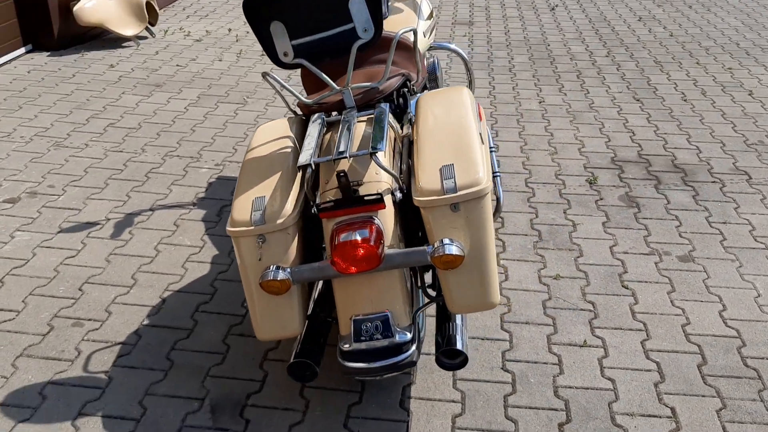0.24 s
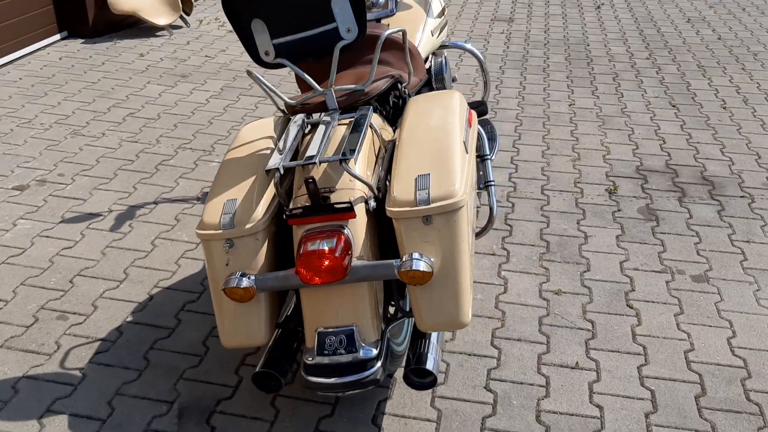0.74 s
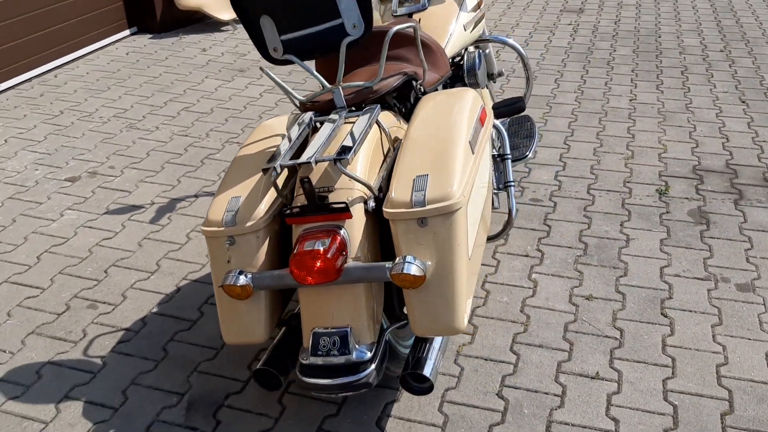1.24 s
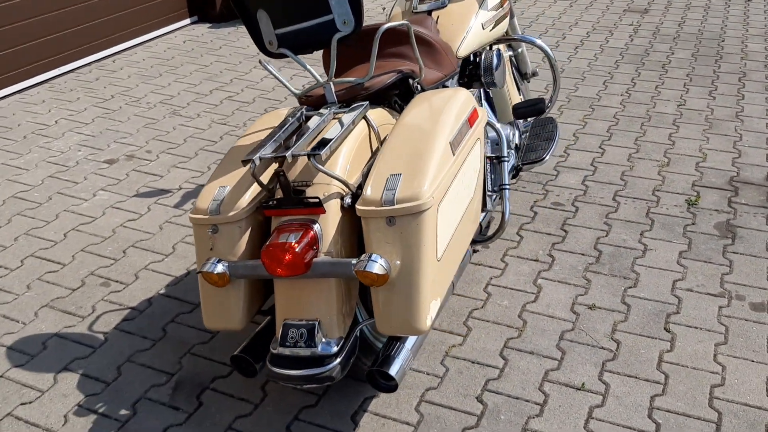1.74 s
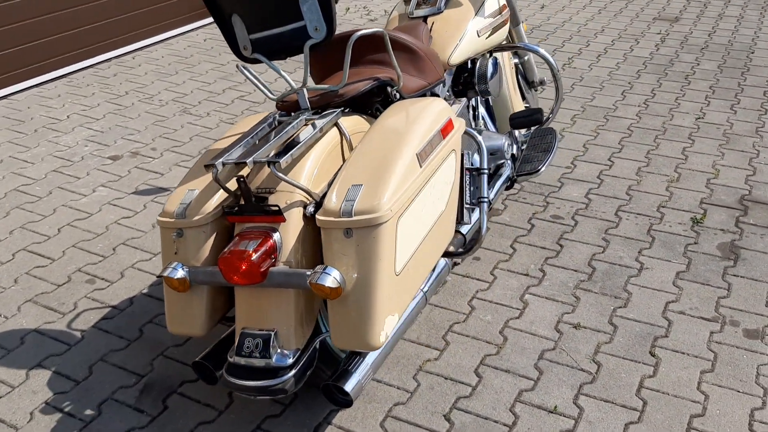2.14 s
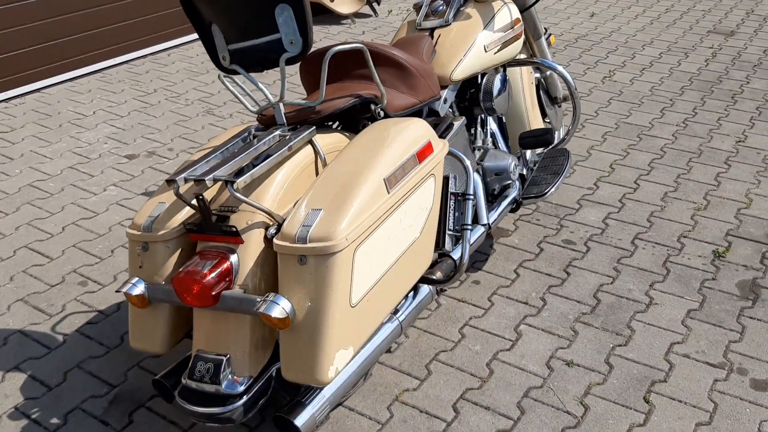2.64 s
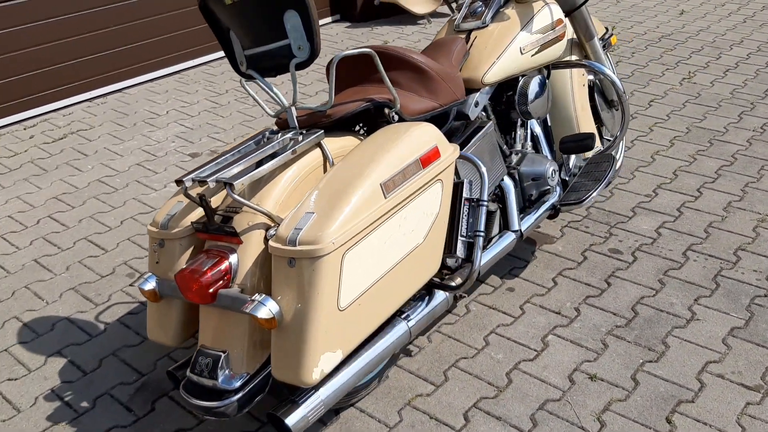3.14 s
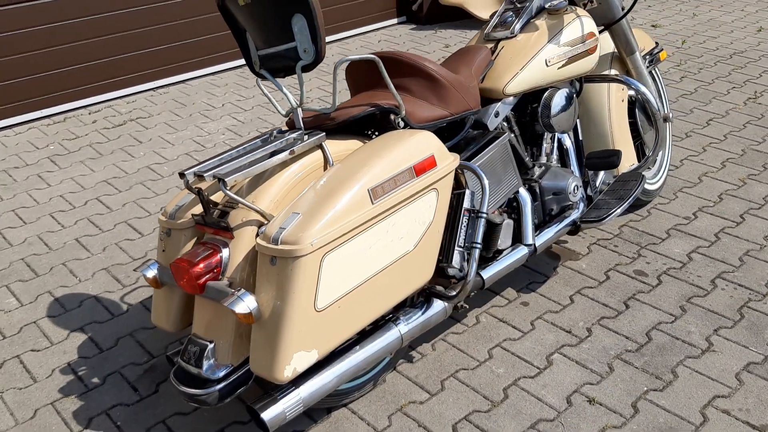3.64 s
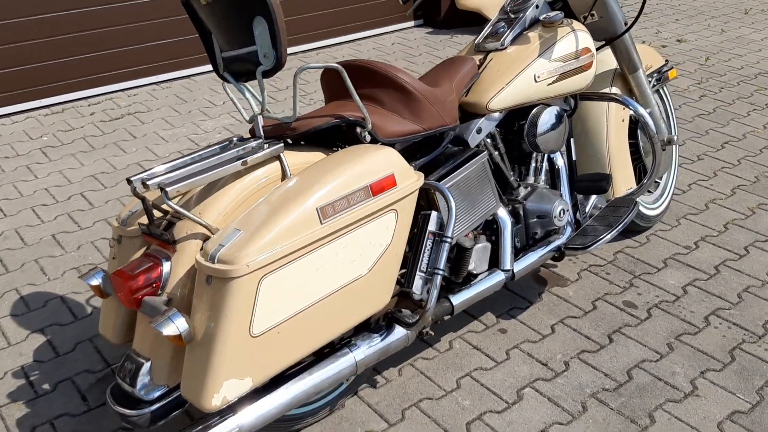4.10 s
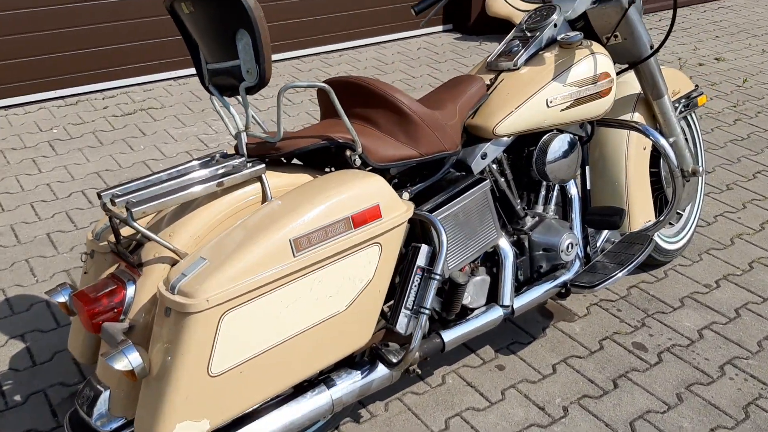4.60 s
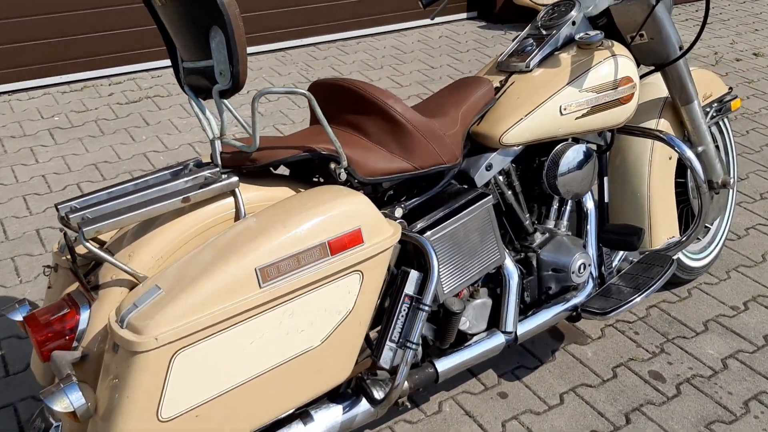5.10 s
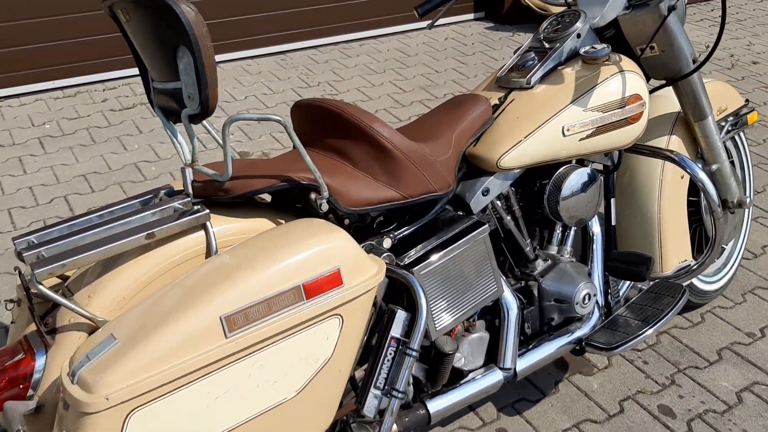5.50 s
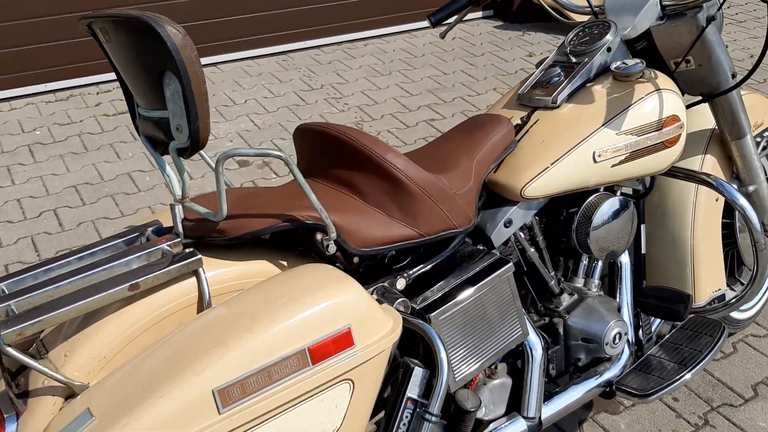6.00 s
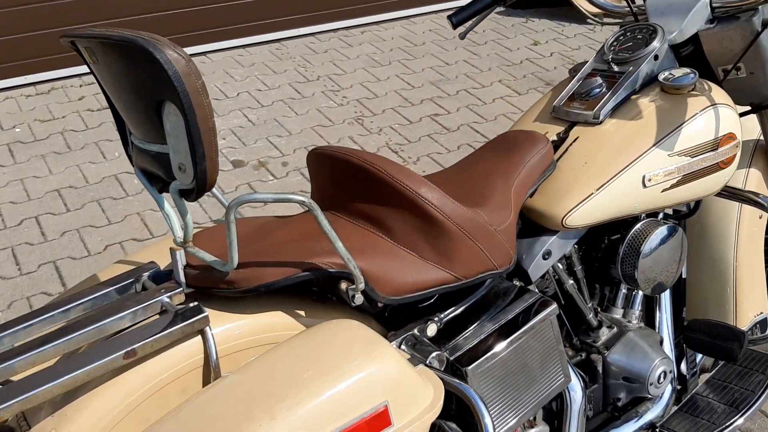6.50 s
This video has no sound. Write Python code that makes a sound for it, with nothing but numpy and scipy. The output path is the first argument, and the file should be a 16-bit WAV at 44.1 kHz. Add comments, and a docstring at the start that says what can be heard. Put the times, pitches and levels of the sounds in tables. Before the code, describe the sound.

Low, lumpy exhaust beats come from a large idling V-twin motorcycle close by, with valves ticking along in step.

```python
"""V-twin motorcycle at idle

A big V-twin lopes on a paved yard while we walk from its tailpipes towards the engine.
Each cylinder either fires (a boom in its pipe, a bark, a hissing, whistling jet of gas) or skips
(a soft suck). Valve gear clatters in step, cooling fins ping, and a garage wall answers faintly."""
import sys
import numpy as np
from scipy import signal
from scipy.fft import rfft, irfft, next_fast_len
from scipy.io import wavfile
from scipy.ndimage import map_coordinates

SR = 44100
rng = np.random.default_rng(int(sys.argv[2]) if len(sys.argv) > 2 else 0)


def master_out(mix):
    """Clip the mix to full scale and print it as 16-bit PCM to the path in sys.argv[1]."""
    frames = np.transpose(np.atleast_2d(mix))
    ceiling = np.clip(frames, -1, 1)
    pcm = np.round(ceiling * 32767).astype(np.int16)
    wavfile.write(sys.argv[1], SR, pcm)


N = 297675

# base idle, drifting and sagging late on; the flywheel's surge adds to it (time [s], speed [rpm])
BASE_IDLE = [(0, 779.1), (1.74, 801.1), (2.19, 743.8), (2.72, 788), (3.64, 809.6), (4.16, 718.3),
             (4.65, 718), (4.77, 760), (4.95, 679), (5.1, 718), (5.35, 718.5), (5.54, 608), (5.93, 674.2),
             (6.75, 770)]
# the rear cylinder skips, except for the strokes near these moments (time [s])
REAR_FIRES = [.27, .6, .91, 1.54, 1.85, 2.31, 2.77, 3.37, 3.82, 4.13, 4.65, 5.18, 5.5, 5.68, 6.02, 6.54]
# the front cylinder fires fully, except for these misfires (time [s], burn [share])
FRONT_MISFIRES = [(.03, 0), (.18, 0), (.52, 0), (1.14, 0), (1.47, 0), (3.45, .6), (3.75, .6), (4.38, 0),
                  (4.74, 0), (6.1, 0), (6.46, .6)]
# balance of a firing along the walk (time [s], boom [dB], bark [dB], hiss [dB], whistle [dB])
EXHAUST_LEVELS = [(0, -5.5, -33, -47.5, -37), (.27, 1.1, -33.5, -46.5, -34.5),
                  (2.3, 0.3, -35.5, -44, -36.5), (3.2, 0.2, -33.5, -47.5, -40.5),
                  (4.1, -0.6, -37.5, -45.5, -49), (5.0, 0.5, -32.5, -40, -49),
                  (5.7, -0.5, -35.5, -42.5, -38), (6.75, 2, -31, -45, -47)]
# valve gear hits (position [share of a cycle], ticking [dB], clatter [dB])
VALVE_HITS = [(.0, 6.5, -20), (.17, -17, -58), (0.362, 1, -0.5), (0.508, 6.5, -15), (.67, -20, -28.5)]
# the engine grows as it comes nearer (time [s], clatter [dB], ticking [dB])
ENGINE_LEVELS = [(0.0, -38.5, -53.5), (0.56, -38.5, -52.5), (1.49, -39.5, -53.5), (3.16, -37, -48),
                 (6.37, -35, -45), (6.75, -33.5, -44.5)]
# the whistle fades as we leave the tailpipe's axis (time [s], level [dB])
WHISTLE_BEAM = [(0, 0), (1.5, 1), (3, -3), (4.5, -8), (6.75, -8)]
# tones of the jet at the tailpipe (pitch [Hz], level [dB], decay [s])
WHISTLE_TONES = [(5350, -6, .008), (5580, -1, .005), (6700, -2, .004), (7300, -12, .005)]
# stray rocker taps (time [s], level [dB])
ROCKER_TAPS = [(4.5336, -38), (4.8738, -26.5), (5.2244, -26), (5.907, -26), (6.2495, -22), (6.4213, -27),
               (6.5914, -25)]

# ringing metal parts (frequency [Hz], width [Hz], level [dB])
CASTING_MODES = [(734, 49, 6), (960, 28, -3.5), (1489, 44, 6.5), (2040, 45, -2.5), (2617, 130, -4.5),
                 (4456, 88, -3), (4960, 87, -6.5), (7550, 750, -20)]
FIN_MODES = [(2615, 40, 3.5), (3055, 67, -5), (4520, 58, 1.5), (5040, 59, -6), (5220, 70, -1),
             (7110, 90, -6)]
PIPE_WALL_MODES = [(1484, 60, -3), (3080, 94, -9.5), (3606, 110, -11.5)]
ROCKER_BOX_MODES = [(1010, 260, -1.5), (1190, 210, 1), (2000, 220, -10)]
# resonances of the gas in the exhaust (frequency [Hz], width [Hz], level [dB])
REAR_PIPE_MODES = [(77.7, 48.5, 45), (56, 13.4, 47), (140.4, 28, 48), (168.9, 4.7, 45.5), (200, 79, 25.5)]
FRONT_PIPE_MODES = [(61.7, 12.5, 47), (104.2, 11.5, 48), (82.6, 62, 48.53), (216, 21, 31), (303, 140, 39.6)]
MUFFLER_MODES = [(75.7, 27.4, 3.5), (137, 25, -4), (170.6, 9.8, 5.5), (250, 28, -11.5)]
TAILPIPE_MODES = [(1500, 140, -1), (3300, 320, 1.5), (5440, 210, 4.5), (6900, 740, -8.5), (8300, 290, -19)]
# noise colours of the valve gear and the firings (frequency [Hz], level [dB])
CLATTER_EQ = [(100, -27), (240, 0), (285, -0.5), (380, 3.5), (520, 1.5), (600, -1), (780, -1), (1150, -2),
              (1300, -5), (1800, -7), (2700, -13.5), (4000, -14), (8000, -85)]
TICKING_EQ = [(800, -50), (2000, 5.5), (3000, 0), (3800, -1.5), (5500, 7.5), (7500, 5.5), (8700, -4.5),
              (10000, 0.5), (11800, 3), (13500, -1.5), (16000, -2.5)]
BARK_EQ = [(120, -57), (235, 13.5), (285, -1.5), (340, 4), (500, -0.5), (600, -9.5), (730, 1), (900, -9.5),
           (1500, -11.5), (2500, -14), (5000, -29)]
HISS_EQ = [(500, -34), (1000, -16), (2000, -6), (3200, 6), (4200, 5.5), (6000, 13.5), (7800, 12.5),
           (8800, 1.5), (11500, 11), (13500, 5), (16000, -1)]

# stereo width of the noise (frequency [Hz], left-right correlation [-1 to 1])
STEREO_LIKENESS = [(150, 0.98), (350, 0.98), (700, 0.87), (1400, 0.53), (2800, 0.028), (6000, -0.2),
                   (12000, -0.018)]
# stereo balance (frequency [Hz], left over right [dB])
BALANCE = [(40, 2.3), (90, 1.8), (180, .8), (350, .2), (1400, .6), (2800, -.5), (5600, -2.2), (11000, -1.1)]
# the bass reaches the two sides out of step (frequency [Hz], left lead [rad])
BASS_PHASE = [(40, 0.39), (80, 0.3), (140, .12), (400, .05)]

FIRST_STROKE_S, REAR_LAG = .0224, .4486  # the rear follows the front by this share of a cycle
# flywheel: kick per unit of burn, the burn that balances the drag, share of surge left a stroke later
KICK_RPM, DRAG_BURN, SURGE_KEPT = 80.8, .6, .7227
# trims on a firing (boom [dB], bark [dB], hiss [dB], whistle [dB])
FRESH_DB = (1.4, 3.3, 4.5, 4.65)  # after a misfire the front has a fresher charge and hits harder
REAR_DB = (0.5, 2.5, 0.5, -0.5)
SCATTER_DB = (0.69, 0.9, .8, 1)
NOISE_POWER = 2.8  # bark and jet grow as this power of the burn
FRONT_SUCK, REAR_SUCK, SUCK_SCATTER_DB = 0.45, 0.42, 2.5  # a skip draws back this share of a push
LOW_CUT_HZ, HIGH_CUT_HZ = 41, 15850


def amp(db):
    """Decibels to gain."""
    return 10 ** (np.asarray(db) / 20)


def unit(x):
    """x at rms 1."""
    return x / np.sqrt(np.mean(x ** 2) + 1e-20)


def clock():
    """The time of every sample."""
    return np.arange(N) / SR


def along(points, hz):
    """A (frequency [Hz], value) curve read on a log axis."""
    f, values = np.transpose(points)
    return np.interp(np.log(hz + 1), np.log(f + 1), values)


def filtered(x, response):
    """x through a complex frequency response."""
    size = next_fast_len(N + SR // 2)
    return irfft(rfft(x, size) * response(np.fft.rfftfreq(size, 1 / SR)), size)[..., :N]


def resonances(modes, f):
    """Causal response of a bank of resonators of alternating polarity."""
    return sum((-1) ** k * amp(db) * 1j * f * width / (hz * hz - f * f + 1j * f * width)
               for k, (hz, width, db) in enumerate(modes))


def noise(colour):
    """Coloured stereo noise of rms 1: narrow in the bass, wide in the treble."""
    size = next_fast_len(N)
    f = np.fft.rfftfreq(size, 1 / SR)
    alike = np.clip(along(STEREO_LIKENESS, f), -1, 1)
    white = rng.standard_normal((2, 2 * len(f))).view(complex)
    mid, side = irfft(white * colour(f) * np.sqrt([1 + alike, 1 - alike]), size)[:, :N]
    return unit(np.array([mid + side, mid - side]))


def eq_noise(eq):
    """Stereo noise through an EQ curve."""
    return noise(lambda f: amp(along(eq, f)))


def ringing_noise(modes):
    """Stereo noise through a bank of resonators."""
    return noise(lambda f: resonances(modes, f))


def flutter(rate_hz, depth_db):
    """A gain of rms 1 that glides between random levels."""
    knots = rng.standard_normal(int(N * rate_hz / SR) + 4)
    return unit(amp(depth_db * map_coordinates(knots, [clock() * rate_hz], order=1)))


def impulses(times, sizes):
    """One impulse of the given size at each time."""
    index = np.round(times * SR).astype(int)
    inside = (index >= 0) & (index < N)
    return np.bincount(index[inside], sizes[inside], N)


def bursts(times, sizes, rise, fall, tail_db, tail):
    """An envelope that swells to each size, then dies in a quick fall plus a tail (times in s)."""
    t = np.arange(SR // 4) / SR
    shape = (1 - np.exp(-(t / rise) ** 2)) * (np.exp(-t / fall) + amp(tail_db) * np.exp(-t / tail))
    power = signal.fftconvolve(impulses(times, sizes ** 2), (shape / shape.max()) ** 2)[:N]
    return np.sqrt(np.abs(power))


def strokes():
    """The lope: burns kick the flywheel, skips let it slow. Columns (time [s], is rear, burn [share])."""
    time, surge_rpm, rear, rows = FIRST_STROKE_S, 0, False, []
    while time < N / SR + .2:
        exceptions = [(when, 1) for when in REAR_FIRES] if rear else FRONT_MISFIRES
        usual_burn = 0 if rear else 1
        burn = next((share for when, share in exceptions if abs(when - time) < .06), usual_burn)
        rows.append((time, rear, burn))
        surge_rpm = SURGE_KEPT * surge_rpm + KICK_RPM * (burn - DRAG_BURN)
        rpm = np.interp(time, *np.transpose(BASE_IDLE)) + surge_rpm
        cycle_s = 2 * 60 / rpm  # two turns of the crank
        time += cycle_s * (1 - REAR_LAG if rear else REAR_LAG)
        rear = not rear
    return [np.array(column) for column in zip(*rows)]


def firings():
    """The strokes that burn (time [s], is rear, push [gain], bark [dB], hiss [dB], whistle [dB])."""
    times, rear, burn = strokes()
    fresh = ~rear & (np.roll(burn, 2) < 1)
    times, rear, burn, fresh = (column[burn > 0] for column in (times, rear, burn, fresh))
    when, *levels = np.transpose(EXHAUST_LEVELS)
    db = np.transpose([np.interp(times, when, level) for level in levels])
    db = db + np.outer(fresh, FRESH_DB) + np.outer(rear, REAR_DB)
    db += rng.standard_normal(db.shape) * SCATTER_DB
    push = burn * amp(db[:, 0])
    bark_db, hiss_db, whistle_db = db[:, 1:].T + NOISE_POWER * 20 * np.log10(burn)
    return times, rear, push, bark_db, hiss_db, whistle_db


def valve_gear():
    """Rockers and tappets rattle in every cycle over the whirr of chain and gears; the castings ring."""
    stroke_times, rear, _ = strokes()
    starts = stroke_times[rear]
    starts = np.r_[2 * starts[0] - starts[1], starts]  # already running as the scene opens
    cycle_s = np.diff(starts)
    position, tick_db, clack_db = np.transpose(VALVE_HITS)
    times = (starts[:-1, None] + cycle_s[:, None] * position).ravel()
    scatter = rng.standard_normal((len(cycle_s), len(position)))
    tick_sizes, clack_sizes = amp(tick_db + 1.3 * scatter).ravel(), amp(clack_db + 2 * scatter).ravel()
    ticks = bursts(times, tick_sizes, rise=.0039, fall=.014, tail_db=-33, tail=.047)
    clacks = bursts(times, clack_sizes, rise=.003, fall=.034, tail_db=-18, tail=.03)
    when, clatter_db, ticking_db = np.transpose(ENGINE_LEVELS)
    near = amp(np.interp(clock(), when, clatter_db))
    bright = amp(np.interp(clock(), when, ticking_db))
    # the steady floor under the hits is the whirr
    clatter = near * np.hypot(clacks, amp(-1)) * eq_noise(CLATTER_EQ) * flutter(400, depth_db=2)
    ticking = bright * np.hypot(ticks, amp(1.5)) * eq_noise(TICKING_EQ) * flutter(1400, depth_db=.6)
    metal = ringing_noise(CASTING_MODES) * flutter(20, depth_db=2.5)
    # the metal rings hardest as the two exhaust valves lift, half a cycle apart
    lifts = np.r_[starts[:-1], starts[:-1] + .51 * cycle_s]
    strikes = bursts(lifts - .004, np.ones(len(lifts)), rise=.0031, fall=.0071, tail_db=-10.5, tail=.083)
    ring = near * (strikes + amp(-12)) * metal
    return amp(-.5) * clatter + amp(.4) * ticking + amp(-5) * ring


def fin_pings():
    """Each exhaust valve taps its cylinder head as it opens, and the cooling fins ping."""
    times = strokes()[0]
    when, _, ticking_db = np.transpose(ENGINE_LEVELS)
    tap_db = np.interp(times, when, ticking_db) + 21.5 + 2.5 * rng.standard_normal(len(times))
    taps = bursts(times - .004, amp(tap_db), rise=.0028, fall=.0099, tail_db=-18, tail=.025)
    return filtered(taps * noise(np.ones_like), lambda f: resonances(FIN_MODES, f))


def pipe(times, pushes, modes, soft_hz, mouth_hz):
    """Rounded gas pulses ring a pipe, whose small mouth radiates little deep bass."""
    def response(f):
        s = 1j * f / mouth_hz
        mouth = s * s / (1 + np.sqrt(2) * s + s * s)
        return resonances(modes, f) * np.exp(-(f / soft_hz) ** 2) * mouth
    return filtered(impulses(times, pushes), response)


def booms(fires):
    """Each stroke pushes or sucks on its pipe; valve overlap adds a small gulp after each rear one."""
    times, is_rear, burn = strokes()
    suck = np.where(is_rear, REAR_SUCK, FRONT_SUCK)
    suck *= amp(SUCK_SCATTER_DB * rng.standard_normal(len(times)))
    when, boom_db, *_ = np.transpose(EXHAUST_LEVELS)
    push = -suck * amp(np.interp(times, when, boom_db))
    push[burn > 0] = fires[2]  # firings push outwards
    rear = pipe(times[is_rear], push[is_rear], REAR_PIPE_MODES, soft_hz=175, mouth_hz=15)
    overlaps = times[is_rear] + .041 + .00254 * rng.standard_normal(is_rear.sum())
    gulp = pipe(overlaps, np.full(len(overlaps), -amp(-10.5)), REAR_PIPE_MODES, soft_hz=185, mouth_hz=43)
    front = pipe(times[~is_rear], push[~is_rear], FRONT_PIPE_MODES, soft_hz=156.4, mouth_hz=74.2)
    return amp(-1.05) * rear + gulp + amp(-1) * front


def combustion(fires):
    """A firing barks just before the boom and rings the castings; its gas churns on in the muffler."""
    times, rear, push, bark_db, _, _ = fires
    # the rear cylinder fires seldom, and then barks earlier and harder
    hard = bursts(times[rear] - .016, amp(bark_db[rear] + 5.5),
                  rise=.0042, fall=.018, tail_db=-11, tail=.13)
    soft = bursts(times[~rear] - .013, amp(bark_db[~rear] + .5),
                  rise=.0022, fall=.0095, tail_db=2, tail=.062)
    blow = np.hypot(hard, soft)
    bark = amp(1.2) * blow * eq_noise(BARK_EQ) * flutter(300, depth_db=2)
    ring = amp(-10.5) * blow * ringing_noise(CASTING_MODES)
    swirl = bursts(times - .012, push, rise=.005, fall=.03, tail_db=-10, tail=.05) + amp(-9)
    churn = swirl * noise(lambda f: resonances(MUFFLER_MODES, f) * np.exp(-(f / 330) ** 2))
    return bark + ring + amp(-27) * churn


def gas_jets(fires):
    """The exhaust valve cracks open: a spit of hiss that rasps in the steel tailpipe and rings it."""
    times, *_, hiss_db, whistle_db = fires
    spit = bursts(times - .0095, amp(hiss_db + 8.5), rise=.0032, fall=.0075, tail_db=-24, tail=.025)
    rasp = bursts(times - .008, amp(whistle_db + 2), rise=.0068, fall=.005, tail_db=-31, tail=.012)
    gas = (spit * eq_noise(HISS_EQ) + rasp * ringing_noise(TAILPIPE_MODES)) * flutter(900, depth_db=1.5)
    ring = bursts(times - .006, amp(whistle_db - 5), rise=.005, fall=.026, tail_db=-20, tail=.03)
    return gas + ring * ringing_noise(PIPE_WALL_MODES)


def jet_whistles(fires):
    """Each jet whistles for a few milliseconds, every time at slightly different pitches."""
    t = np.arange(SR // 10) / SR
    hz, tone_db, decay = np.transpose(WHISTLE_TONES)[:, :, None]
    shape = (1 - np.exp(-(t / .003) ** 2)) * np.exp(-t / decay)
    shape /= shape.max(axis=1, keepdims=True)
    out = np.zeros((2, N + SR))
    for time, *_, whistle_db in zip(*fires):
        detune, strength, bearing = rng.standard_normal((3, len(hz), 1))
        # turbulence makes the phase wander, so the tones stay breathy
        wander = .06 * np.cumsum(rng.standard_normal(shape.shape), axis=1)
        phase = 2 * np.pi * hz * (1 + .012 * detune) * t + wander
        level = amp(whistle_db + 4 + tone_db + 1.5 * strength) * shape
        whistle = [np.sum(level * np.sin(phase + side * .5 * bearing), axis=0) for side in (1, -1)]
        start = round((time - .009) * SR)
        out[:, start:start + len(t)] += whistle
    return out[:, :N]


def rocker_taps():
    """Late in the walk, a rocker now and then taps softly in its box."""
    times, level_db = np.transpose(ROCKER_TAPS)
    taps = bursts(times, amp(level_db - 8), rise=.003, fall=.011, tail_db=-15, tail=.025)
    return taps * ringing_noise(ROCKER_BOX_MODES)


def yard_echo(x, t60):
    """A thin, short echo from the paving and the garage wall."""
    t = np.arange(SR // 2) / SR
    tail = rng.standard_normal((2, len(t))) * amp(-60 * t / t60) * (t > .012)
    return signal.fftconvolve(x, tail / np.linalg.norm(tail[0]), axes=1)[:, :N]


def scene():
    """The mix: dry booms under a top layer with a touch of yard; bass leans left, hiss right."""
    fires = firings()
    beam = amp(np.interp(clock(), *np.transpose(WHISTLE_BEAM)))
    exhaust = combustion(fires) + gas_jets(fires) + beam * jet_whistles(fires)
    top = exhaust + valve_gear() + fin_pings() + rocker_taps()
    low = filtered(booms(fires), lambda f: np.exp(.5j * np.outer([1, -1], along(BASS_PHASE, f))))
    bike = low + top + amp(-15) * yard_echo(top, t60=.12)
    return filtered(bike, lambda f: amp(np.outer([1, -1], along(BALANCE, f)) / 2))


def record(dry):
    """Master EQ: rolls off the deepest bass and cuts the very top."""
    return filtered(dry, lambda f: (f < HIGH_CUT_HZ) * (1 - np.exp(-(f / LOW_CUT_HZ) ** 5)))


dry = scene()
out = record(dry)
master_out(out)
```